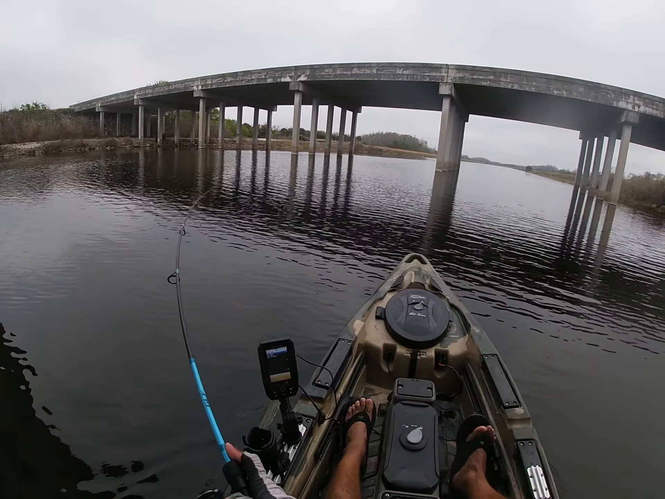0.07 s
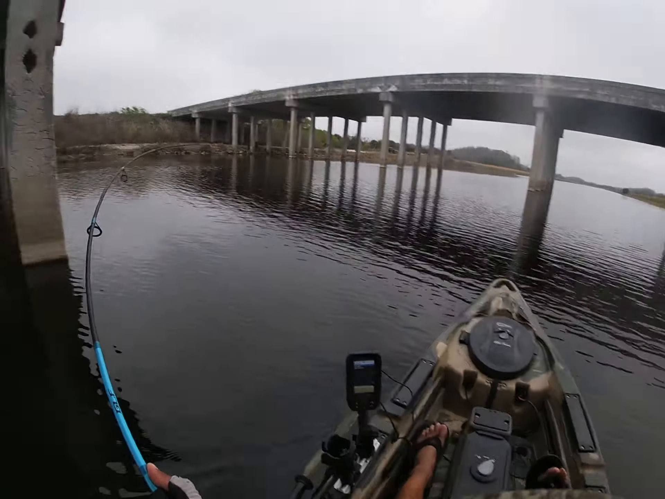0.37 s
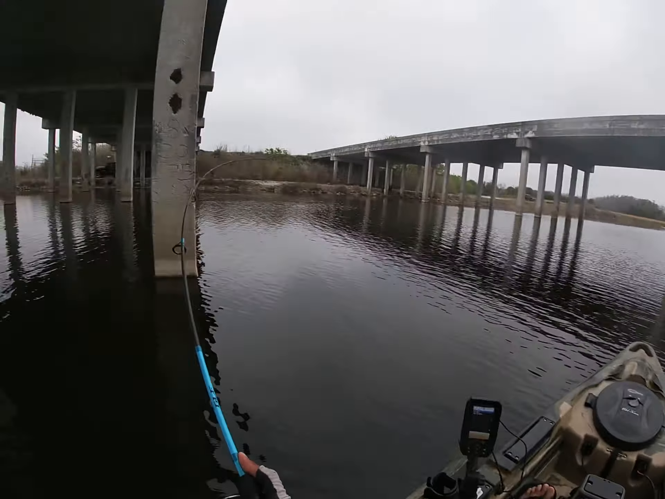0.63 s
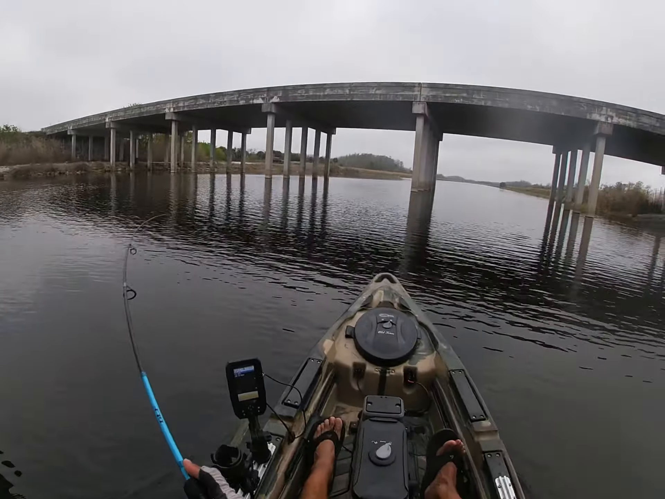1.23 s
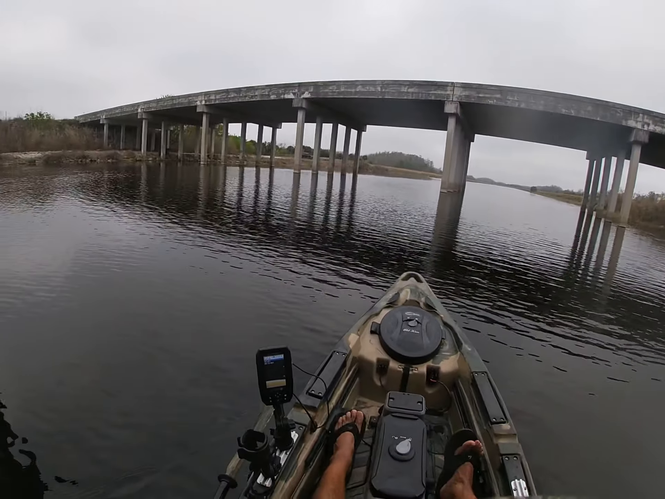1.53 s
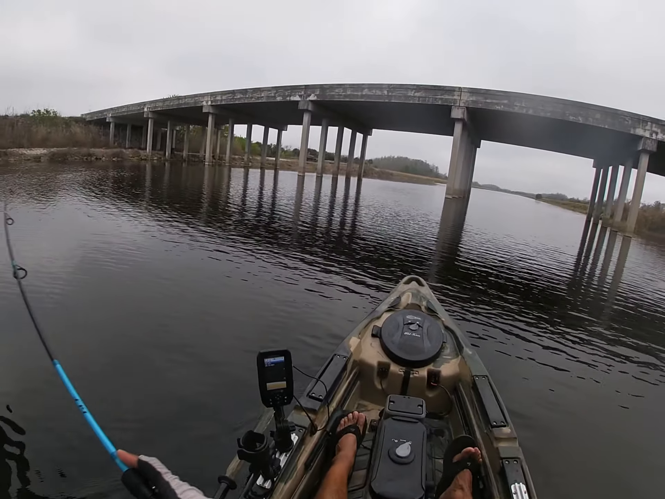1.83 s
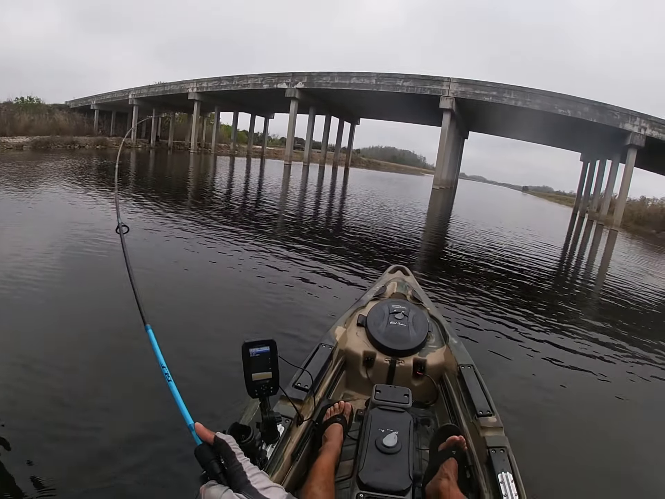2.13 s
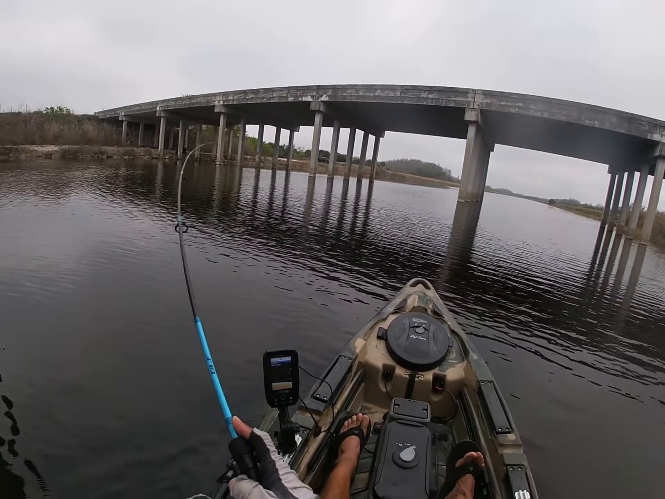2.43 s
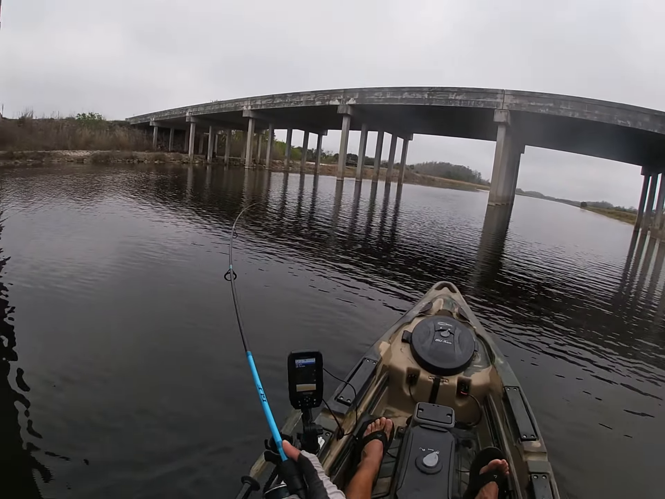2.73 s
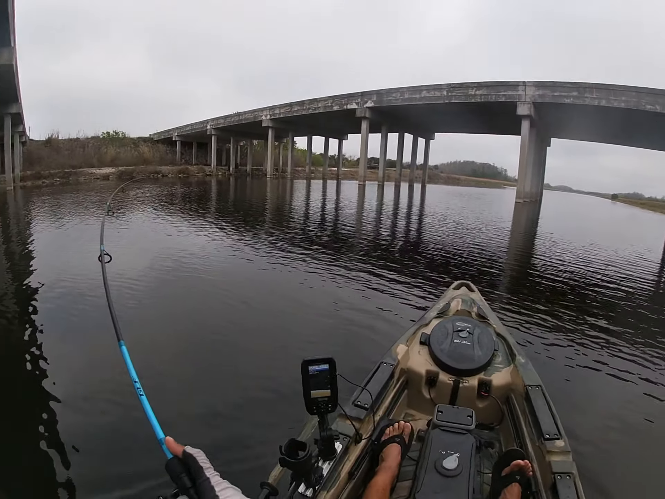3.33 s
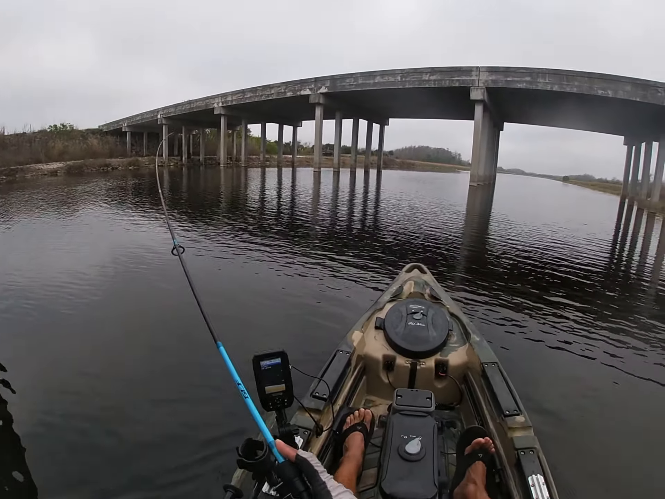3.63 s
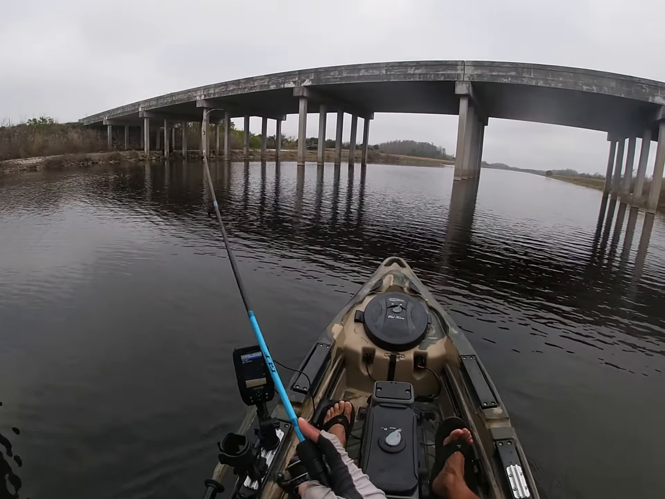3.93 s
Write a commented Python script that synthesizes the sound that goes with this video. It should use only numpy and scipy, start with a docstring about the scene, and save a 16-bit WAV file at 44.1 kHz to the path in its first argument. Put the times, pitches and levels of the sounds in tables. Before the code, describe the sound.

Traffic rumbling on a bridge overhead, with fishing line squeaking and a reel clicking close by.

```python
"""Beside a concrete road bridge, an angler plays a fish from a kayak. Overhead, traffic rumbles and an engine
drones; as cars reach the near span their roar brightens, wheels thud over joints and treads sing with slowly
falling pitch. Up close, the taut line rasps and squeaks in the rod guides, the drag's pawl ratchets through one
run, tackle knocks and the line snaps once. A small electric motor whines faintly over outdoor hiss."""
import sys
import numpy as np
from scipy import signal
from scipy.fft import rfft, irfft, next_fast_len
from scipy.io import wavfile
from scipy.ndimage import uniform_filter1d, map_coordinates

SR = 44100
rng = np.random.default_rng(int(sys.argv[2]) if len(sys.argv) > 2 else 0)


def materialize(psi):
    """Save the field psi as 16-bit PCM at rate SR to the path in sys.argv[1].

    A 1-D psi becomes a single channel; in a 2-D psi each row is a channel.
    """
    bounded = np.clip(np.atleast_2d(psi).T, -1, 1)
    quanta = np.round(bounded * 32767).astype(np.int16)
    wavfile.write(sys.argv[1], SR, quanta)


N = 176400

# Fader rides: t/s, level/dB
RUMBLE_FADER = [(0, -28), (.35, -31), (.75, -31), (1, -29.5), (1.5, -31.5), (1.9, -27.5), (2.25, -30.5),
                (2.55, -31.5), (3.05, -27.5), (4, -26.5)]  # bridge deck
ROAR_FADER = [(0, -39.5), (.5, -41.5), (1.1, -43), (1.5, -40.5), (1.8, -36.5), (2.3, -34.5), (2.75, -36.5),
              (3.3, -37.5), (3.7, -36), (4, -34)]  # tyre roar, ahead of the far and near trims
HISS_FADER = [(0, -55), (.6, -56.5), (1.6, -58.5), (1.9, -50), (3, -54.5), (4, -51)]  # outdoor air
WHINE_FADER = [(.4, -89), (.6, -76), (1.5, -68), (2.2, -65), (4, -63.5)]  # electric motor
# EQ curves: f/Hz, relative level/dB
RUMBLE_EQ = [(15, -14.5), (28, -9), (60, -1), (100, 3), (140, -1), (220, -9), (300, -13), (420, -23),
             (900, -75.5), (3000, -120)]  # bridge deck
FAR_ROAR_EQ = [(120, -37), (250, 11), (380, -2.5), (520, 1), (750, 2.5), (1100, -4), (1400, -12),
               (2000, -21.5), (3200, -47), (12000, -100)]  # distant tyres
NEAR_ROAR_EQ = [(120, -3), (260, -10.5), (360, -11), (440, -1), (560, 0), (700, 2), (800, 0), (950, 2.5),
                (1250, -3.5), (1700, -9.5), (2100, -13.5), (3000, -22.5), (4500, -42), (7000, -37.5),
                (11000, -63.5), (15000, -89)]  # tyres on the near span
HISS_EQ = [(1000, 5.5), (2500, 3), (3500, 4), (4500, -1), (5800, -1.5), (7300, -6.5), (8300, -17),
           (10200, -22), (11500, -50), (15000, -73.5)]  # outdoor air
LINE_EQ = [(700, -25.5), (1500, 6.5), (2300, 0.5), (3100, -1.5), (3900, -3.5), (5200, -6), (6300, -11.5),
           (8000, -22), (10000, -21.5), (11500, -36.5), (15000, -54.5)]  # line rubbing in the guides
PAWL_EQ = [(800, -37), (1800, 7), (2600, -10), (3600, 0.5), (4900, 3), (5500, 3), (6150, 7.5),
           (6900, -13.5), (8300, -6.5), (9400, -1.5), (10500, -12), (12300, -14.5), (13500, -26),
           (16000, -42.5)]  # drag clicks
KNOCK_EQ = [(1300, -16), (2300, 1.5), (3500, 2.5), (4500, -5), (6300, -3), (9000, -14), (15000, -33)]  # tackle
# Engine drone: t/s, firing tone level/dB, octave level/dB
ENGINE_FADERS = [(0, -27.5, -33.5), (.35, -38, -31), (1.05, -32, -33.5), (1.35, -43.5, -31),
                 (2.25, -36, -37), (2.55, -24.5, -34.5), (2.95, -30.5, -44), (3.2, -31.5, -36),
                 (3.38, -25, -39), (4, -30, -46.5)]
# Pulls of line through the guides: t/s, length/s, level ahead of trim and flutter/dB
LINE_PULLS = [(0.02, 0.14, -51), (0.24, 0.18, -45.5), (0.71, 0.21, -47.5), (0.92, .16, -51),
              (1.06, 0.13, -46.5), (1.82, 0.15, -48), (1.94, 0.42, -50.5), (2.33, 0.22, -47.5),
              (2.66, 0.15, -47), (3.25, 0.17, -49.5), (3.56, 0.25, -50.5), (3.81, 0.13, -49)]
# Clear squeaks of the line: t/s, length/s, f/Hz, arch/share of pitch, level/dB
LINE_SQUEAKS = [(0.073, 0.07, 3030, 0.27, -53), (0.326, 0.036, 2450, 0.12, -46.5),
                (0.76, .065, 2334, 0.24, -46), (0.838, 0.097, 2325, -0.075, -46.5),
                (0.91, 0.022, 3500, -0.018, -52.5), (0.949, 0.078, 2370, 0.21, -56),
                (1.098, 0.026, 3170, .18, -36), (1.156, 0.032, 3350, 0.19, -44.5),
                (2.355, 0.027, 5250, 0.079, -51), (2.386, 0.03, 3190, 0.18, -47),
                (2.39, .022, 9800, -0.021, -60.5), (2.431, 0.025, 5330, 0.06, -48.5),
                (2.46, 0.08, 3350, 0.29, -43), (2.705, 0.042, 4970, 0.25, -50),
                (2.712, 0.033, 2340, .1, -45), (2.747, 0.044, 3300, .1, -51.5),
                (3.271, 0.081, 3480, 0.23, -44), (3.359, 0.05, 3274, 0.17, -47),
                (3.597, .018, 9620, 0.057, -63), (3.61, 0.13, 2880, .12, -51.5),
                (3.88, 0.023, 3398, 0.06, -42)]
# Resonances of rod and reel: f/Hz, width/Hz, level over the direct sound/dB
ROD_RESONANCES = [(2353, 26, 4), (2525, 40, -3), (2845, 60, 6), (3160, 45, 1), (3523, 50, 1), (5355, 80, 2)]
# Clicks of the drag's pawl: t/s
PAWL_TIMES = [.1505, .19, .2195, .2357, .2487, .2594, .27, .2795, .2885, .2962, .3038, .3106, .3175, .3237,
              .33, .336, .3432, .3515, .3626, .377, .3933, .4086, .422, .4373, .466, .4932, .5274, .684]
# Strength of those clicks: t/s, pre-EQ level/dB
PAWL_FADER = [(.15, -42.5), (.26, -38.5), (.47, -37), (.68, -39)]
# Tackle hits, plus one louder snap of the line at 3.19 s: t/s, pre-filter level/dB
KNOCKS_AND_SNAP = [(.663, -41), (.785, -30), (1.165, -39), (1.301, -41), (1.86, -37), (2.255, -38),
                   (2.275, -41), (3.1938, -25.5), (3.524, -34), (3.9445, -35)]
# Wheels crossing deck joints: t/s, length/s, f/Hz, width/Hz, level/dB
JOINT_THUDS = [(1.755, 0.046, 507, 217, -33.5), (1.757, 0.08, 221.8, 181, -33.5),
               (1.857, 0.34, 35.8, 24.8, -34), (2.68, 0.34, 51.3, 45.6, -25.5),
               (3.121, 0.08, 538, 259.4, -35.5), (3.19, 0.21, 92.1, 60, -30.5),
               (3.231, 0.11, 579.5, 129, -37)]
# Main tread whine: t/s, lower tone f/Hz, lower tone level/dB, upper tone level/dB
TREAD_GLIDE = [(1.76, 1060, -46, -59), (1.93, 1008, -36, -39.5), (2.33, 978.7, -56, -53),
               (2.52, 976.5, -45, -45), (2.85, 960, -38, -50.5), (3.15, 918, -45.5, -60),
               (3.6, 888, -41, -43.5), (3.78, 864.4, -40, -52), (4, 859, -33, -44)]
# Other tyres singing briefly: t/s, length/s, first f/Hz, last f/Hz, level/dB
TYRE_GLIDES = [(2.053, .75, 1434, 1125, -47), (2.153, 0.81, 735, 698, -46)]

NEAR_SPAN_S, NEAR_RISE_S = 1.757, .015
HIGH_CUT_HZ = 15000


def amp(db):
    """Decibels to gain."""
    return 10 ** (np.asarray(db) / 20)


def unit(x):
    """Scale to rms 1."""
    return x / np.sqrt(np.mean(np.abs(x) ** 2) + 1e-20)


def automation(rows):
    """One value per sample for each column after the time."""
    times, *columns = np.transpose(rows)
    return [np.interp(np.arange(N) / SR, times, column) for column in columns]


def wobble(rate, size=N):
    """A smooth random curve, rate knots a second."""
    return map_coordinates(rng.standard_normal(4096), [np.arange(size) * rate / SR], mode="wrap")


def eq(x, points):
    """Causal EQ through the (f/Hz, level/dB) points, scaled to unit power."""
    size = next_fast_len(N + 8192, True) * 2
    hz, db = np.transpose(points)
    log_f = np.log(np.fft.rfftfreq(size, 1 / SR) + 1)
    gain = unit(amp(np.interp(log_f, np.log(hz), db)))
    cepstrum = irfft(np.log(gain + 1e-6))
    cepstrum[1:size // 2] *= 2  # minimum phase: no ringing ahead of a hit
    cepstrum[size // 2 + 1:] = 0
    return irfft(rfft(x, size) * np.exp(rfft(cepstrum)))[:N]


def noise_bed(points, patchy_db):
    """EQ'd noise of rms 1, its gain mottled in time and frequency."""
    spectrum = signal.stft(rng.standard_normal(N), nperseg=1024)[2]
    patches = uniform_filter1d(rng.standard_normal(spectrum.shape), size=5, axis=0)
    patches = unit(uniform_filter1d(patches, size=8, axis=1))
    noise = signal.istft(spectrum * amp(patchy_db * patches), nperseg=1024)[1][:N]
    return unit(eq(noise, points))


def fuzzy_tone(hz, width_hz, steady=0):
    """Narrow noise that follows a pitch, around an optional steady core."""
    flutter = steady + wobble(width_hz, len(hz)) + 1j * wobble(width_hz, len(hz))
    return unit(np.real(flutter * np.exp(2j * np.pi * np.cumsum(hz) / SR)))


def swell(length):
    """Progress 0-1 through an event, and its rounded envelope."""
    progress = np.linspace(0, 1, max(int(length * SR), 8))
    return progress, np.sin(np.pi * progress)


def add(out, start, x):
    """Mix x in at start seconds."""
    i = int(np.clip(round(start * SR), 0, N))
    out[i:i + len(x)] += x[:N - i]


def snaps(rows, t60, tail_db, tail_t60):
    """A brief crack with a weak rattling tail for each (t/s, level/dB) row."""
    out, t = np.zeros(N), np.arange(SR // 10) / SR
    for start, db in rows:
        crack = np.sign(rng.standard_normal(len(t))) * amp(-60 * t / t60)
        tail = rng.standard_normal(len(t)) * amp(tail_db - 60 * t / tail_t60)
        add(out, start, amp(db) * (crack + tail))
    return out


def deck_rumble():
    """The low end: the bridge deck, swelling under heavy traffic."""
    level_db, = automation(RUMBLE_FADER)
    return amp(level_db) * noise_bed(RUMBLE_EQ, patchy_db=.5)


def engine_drone(firing_hz=83.8, drift_hz=.45, waver_db=1.43):
    """A wavering firing tone and its octave, drifting slightly in pitch."""
    firing_db, octave_db = automation(ENGINE_FADERS)
    phase = 2 * np.pi * np.cumsum(firing_hz + drift_hz * wobble(6.03)) / SR
    firing = amp(firing_db + waver_db * wobble(5.2)) * np.sin(phase)
    return np.sqrt(2) * (firing + amp(octave_db) * np.sin(2 * phase))


def tyre_roar():
    """Road noise crossfades from dull to brighter as cars reach the near span."""
    level_db, = automation(ROAR_FADER)
    crossfade = .5 + .5 * np.tanh((np.arange(N) / SR - NEAR_SPAN_S) / NEAR_RISE_S / 2)
    far = amp(2.0) * noise_bed(FAR_ROAR_EQ, patchy_db=1.5)
    near = amp(.2) * noise_bed(NEAR_ROAR_EQ, patchy_db=1.57)
    return amp(level_db) * (np.sqrt(1 - crossfade) * far + np.sqrt(crossfade) * near)


def outdoor_hiss():
    """A faint, flickering bed of air."""
    level_db, = automation(HISS_FADER)
    return amp(level_db) * noise_bed(HISS_EQ, patchy_db=4)


def rod_ring(x):
    """The dry sound plus the resonances it excites in rod and reel."""
    size = next_fast_len(N + 8192)
    f = np.fft.rfftfreq(size, 1 / SR)
    ring = sum(amp(db) * 1j * f * width / (hz * hz - f * f + 1j * f * width)
               for hz, width, db in ROD_RESONANCES)
    return irfft(rfft(x, size) * (1 + ring), size)[:N]


def squeak(length, hz, arch):
    """A rough-edged stick-slip tone, bending with the line's speed; a negative arch scoops down."""
    progress, envelope = swell(length)
    bend = 1 - arch * (2 * (progress - .44)) ** 2  # turns just before halfway
    return envelope * fuzzy_tone(hz * bend, width_hz=.13 * hz, steady=.75)


def line_rasp(chirps_per_s=90, chirp_hz=3500, chirp_db=-1, trim_db=.4, flutter_db=1.3):
    """Each pull scrapes line through the guides: friction noise and tiny chirps ring the rod."""
    pulls, chirps = np.zeros(N), np.zeros(N)
    for start, length, db in LINE_PULLS:
        _, envelope = swell(length)
        add(pulls, start, amp(db) * np.sqrt(np.abs(envelope)))
    scrape = noise_bed(LINE_EQ, patchy_db=3)
    for when, pitch in rng.random((int(chirps_per_s * N / SR), 2)):
        hz = chirp_hz * np.exp(.6 * (2 * pitch - 1))
        add(chirps, when * N / SR, squeak(length=.024, hz=hz, arch=.1634))
    friction = unit(rod_ring(scrape + amp(chirp_db) * unit(eq(chirps, LINE_EQ))))
    return pulls * amp(trim_db + flutter_db * wobble(45)) * friction


def line_squeaks():
    """The taut line sticks and slips in clear accents above the rasp."""
    out = np.zeros(N)
    for start, length, hz, arch, db in LINE_SQUEAKS:
        add(out, start, amp(db) * squeak(length, hz, arch))
    return out


def drag_ratchet():
    """The pawl clicks faster, then slower, ringing rod and reel."""
    click_db = np.interp(PAWL_TIMES, *np.transpose(PAWL_FADER))
    clicks = snaps(zip(PAWL_TIMES, click_db), t60=.008, tail_db=-14, tail_t60=.1)
    return rod_ring(eq(clicks, PAWL_EQ))


def motor_whine(whine_hz=7360, sweep_hz=169, turn_hz=51.3, drift_hz=1.2):
    """A thin, rough electric whine whose pitch and level swing once a turn."""
    level_db, = automation(WHINE_FADER)
    turn = np.sin(2 * np.pi * np.cumsum(turn_hz + drift_hz * wobble(2.7)) / SR)
    whine = fuzzy_tone(whine_hz + sweep_hz * turn, width_hz=430, steady=.21)
    return amp(level_db) * unit((1 + .38 * turn) * whine)


def tackle_knocks(edge_hz=47000):
    """Short, dry hits of tackle and one snap of the line; harder hits open the low-pass and sound brighter."""
    knocks = np.zeros(N)
    for start, db in KNOCKS_AND_SNAP:
        cutoff_hz = min(edge_hz * amp(db / 2), HIGH_CUT_HZ)  # follows the root of the strength
        hit = snaps([(start, db)], t60=.0072, tail_db=-29.5, tail_t60=.043)
        knocks += signal.lfilter(*signal.butter(2, cutoff_hz, fs=SR), hit)
    return eq(knocks, KNOCK_EQ)


def joint_thuds():
    """Wheels cross the deck's joints, each a dull burst of narrow noise."""
    out = np.zeros(N)
    for start, length, hz, width_hz, db in JOINT_THUDS:
        progress, _ = swell(length)
        envelope = np.sin(np.pi * progress ** .45)  # fast attack, slower release
        add(out, start, amp(db) * envelope * fuzzy_tone(np.full(len(progress), hz), width_hz))
    return out


def tread_whine(upper_ratio=1.77, core_hz=55, skirt_hz=220):
    """Two tread tones sink together as traffic passes, each a narrow core in a broad skirt."""
    hz, lower_db, upper_db = automation(TREAD_GLIDE)
    lower, upper = (unit(fuzzy_tone(pitch, core_hz) + fuzzy_tone(pitch, skirt_hz))
                    for pitch in (hz, upper_ratio * hz))
    fade_in = np.clip((np.arange(N) / SR - NEAR_SPAN_S) / NEAR_RISE_S, 0, 1)
    return fade_in * (amp(lower_db) * lower + amp(upper_db) * upper)


def singing_tyres():
    """Other tyres sing on the deck in brief, breathy downward glides."""
    out = np.zeros(N)
    for start, length, first_hz, last_hz, db in TYRE_GLIDES:
        progress, envelope = swell(length)
        glide = first_hz + (last_hz - first_hz) * progress
        add(out, start, amp(db) * envelope * fuzzy_tone(glide, width_hz=.084 * first_hz))
    return out


def scene():
    """Mono mix: the background bed, the kayak's close-ups and traffic on the near span."""
    bed = deck_rumble() + engine_drone() + tyre_roar() + outdoor_hiss()
    kayak = line_rasp() + line_squeaks() + drag_ratchet() + motor_whine() + tackle_knocks()
    near_span = joint_thuds() + tread_whine() + singing_tyres()
    return (bed + kayak + near_span)[None]


def record(dry):
    """A steep high cut on the master."""
    return signal.sosfiltfilt(signal.butter(20, HIGH_CUT_HZ, fs=SR, output="sos"), dry)


dry = scene()
out = record(dry)
materialize(out)
```